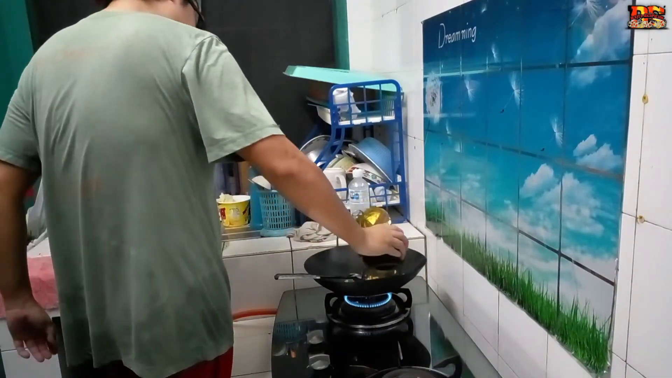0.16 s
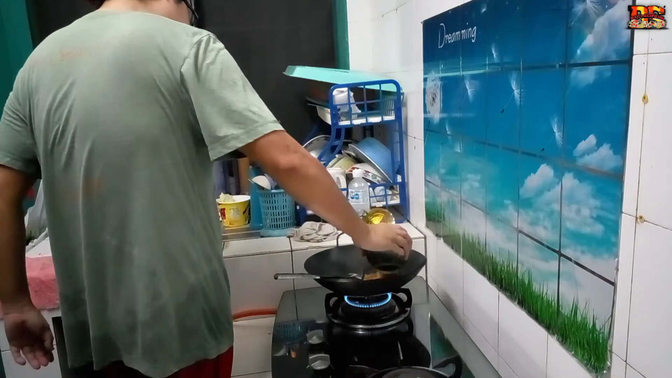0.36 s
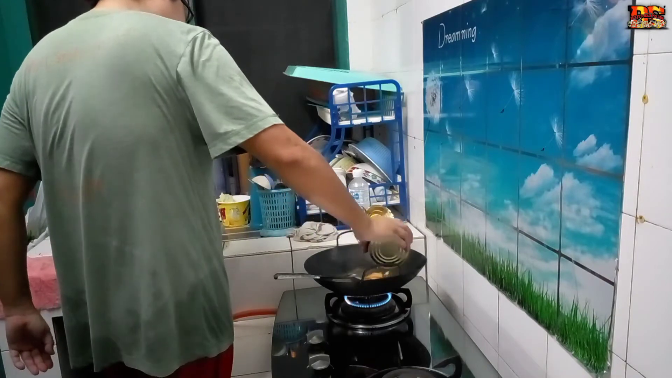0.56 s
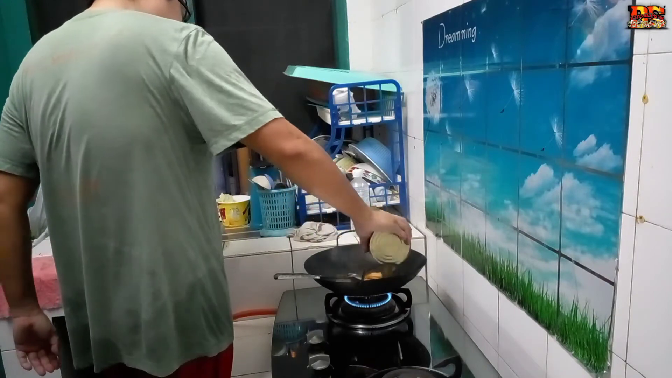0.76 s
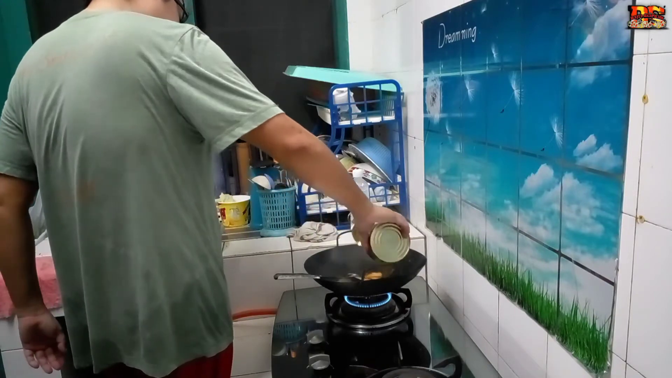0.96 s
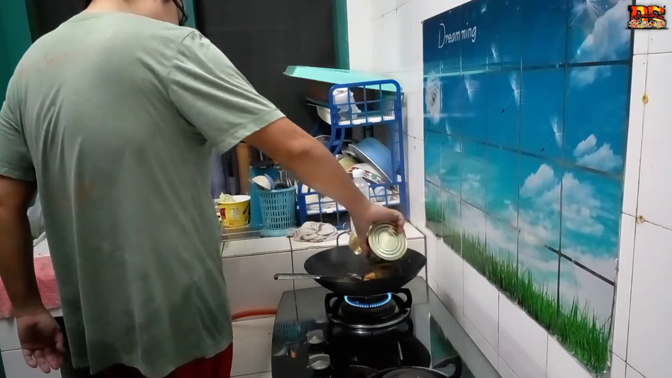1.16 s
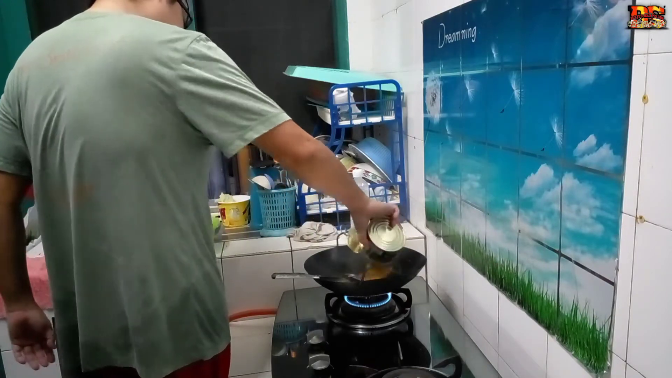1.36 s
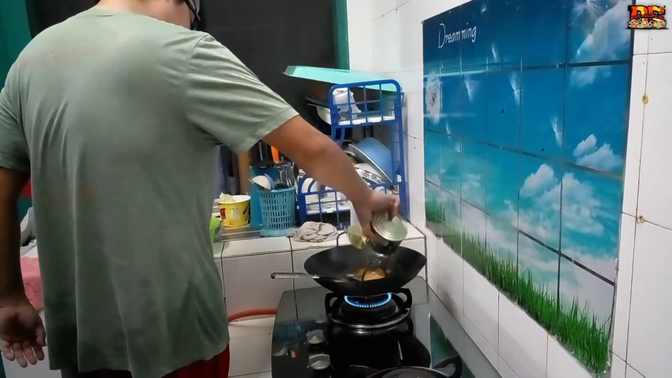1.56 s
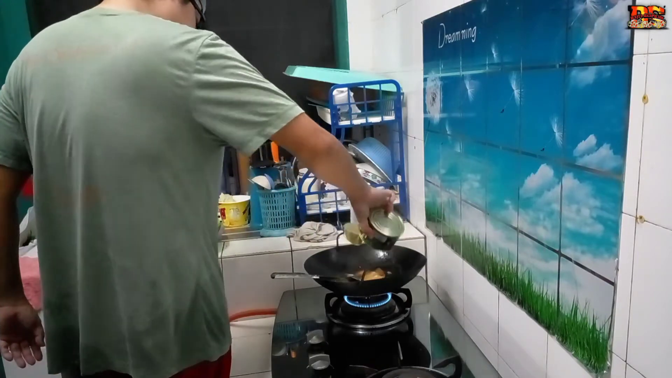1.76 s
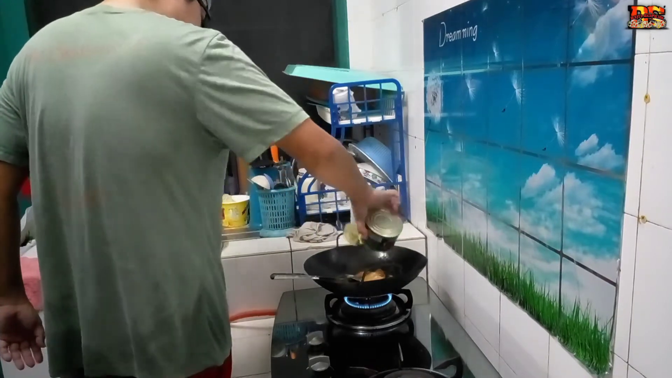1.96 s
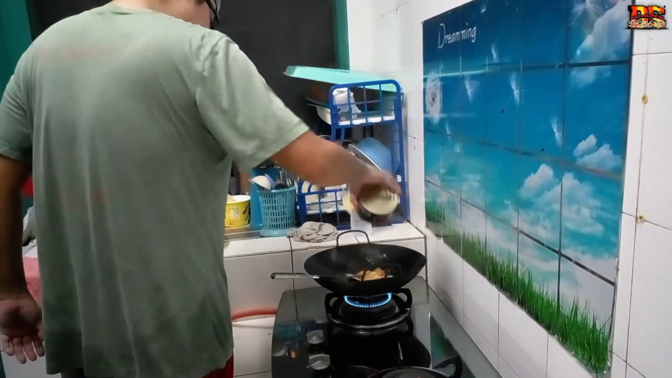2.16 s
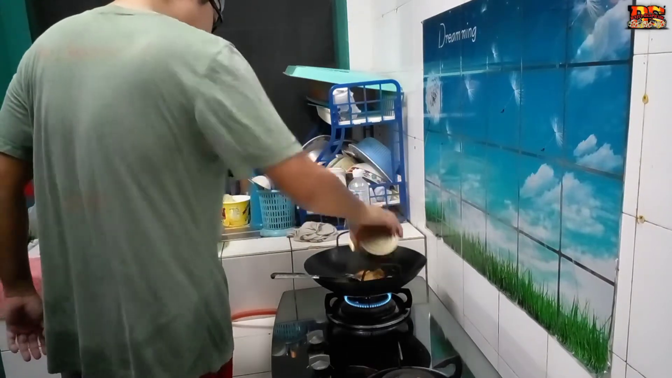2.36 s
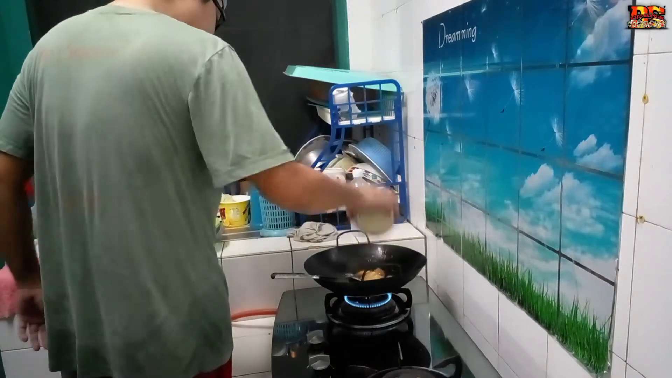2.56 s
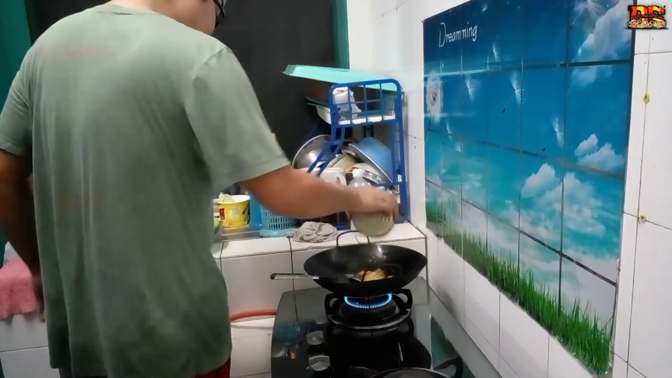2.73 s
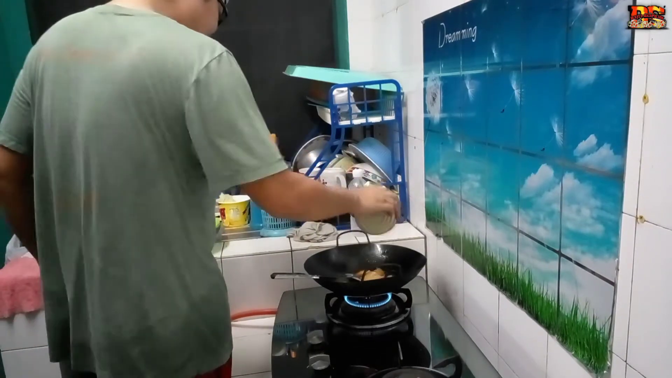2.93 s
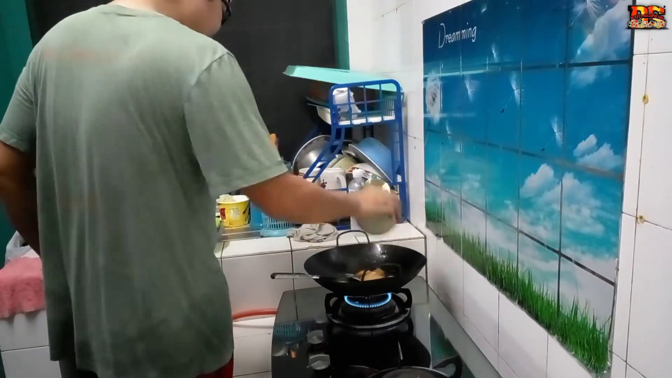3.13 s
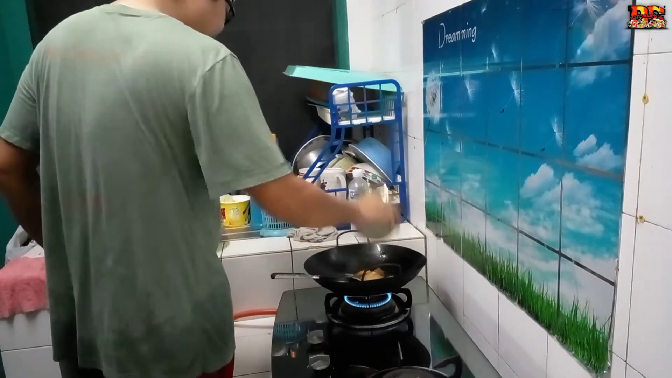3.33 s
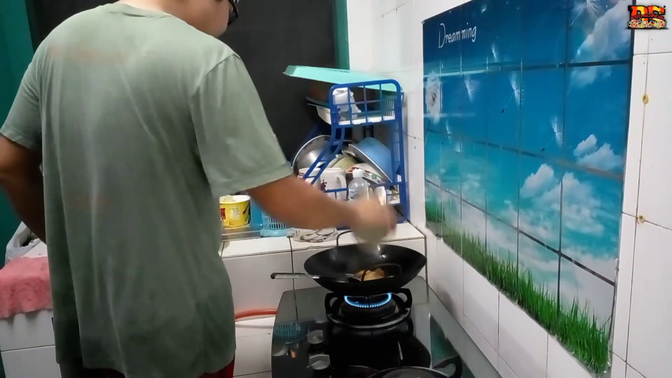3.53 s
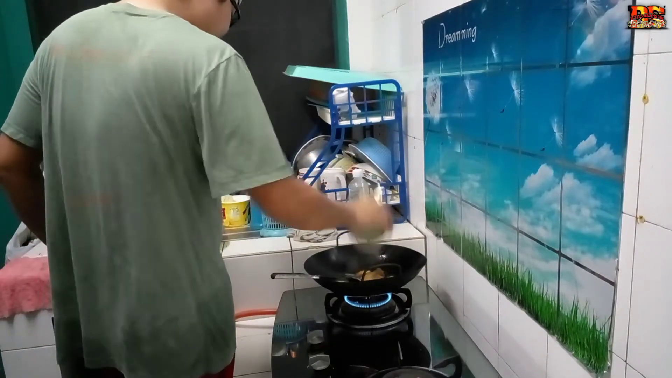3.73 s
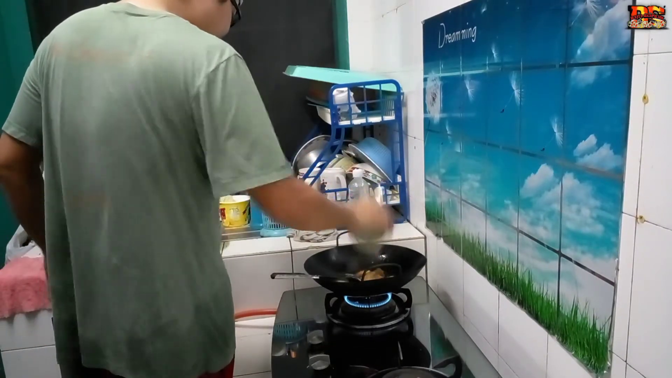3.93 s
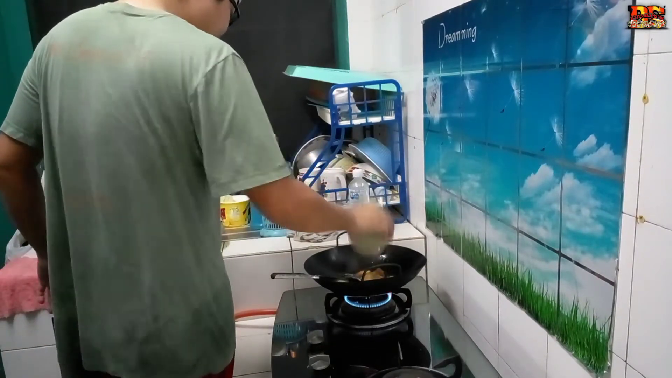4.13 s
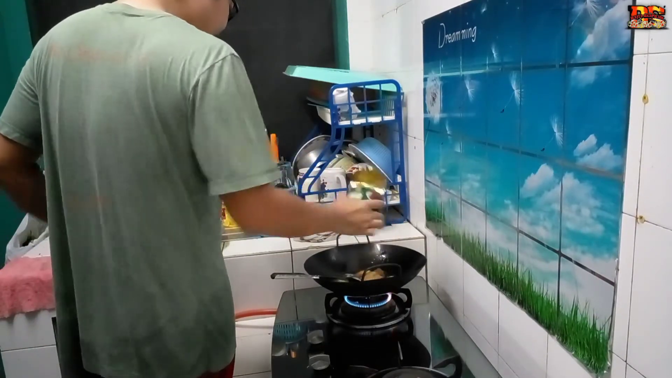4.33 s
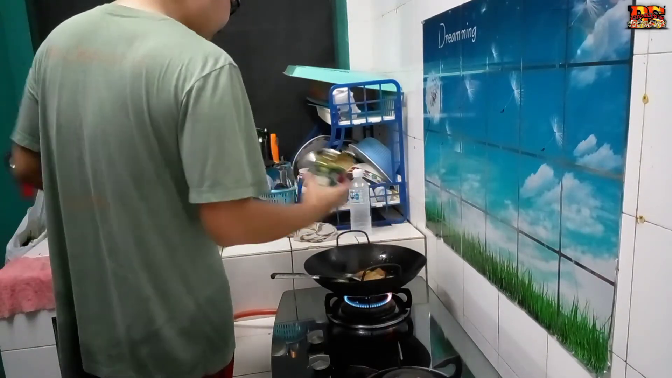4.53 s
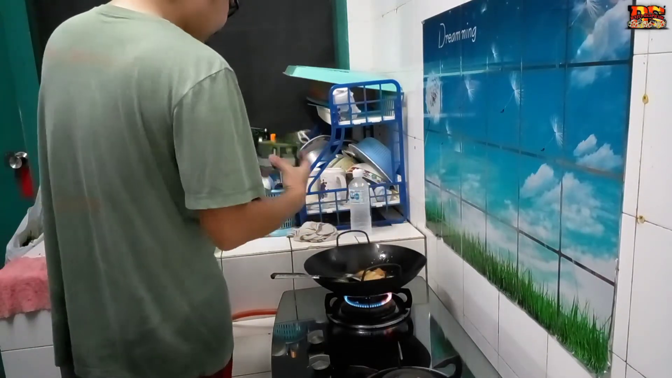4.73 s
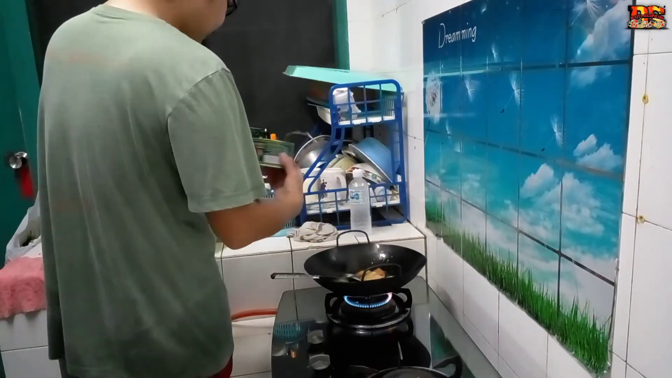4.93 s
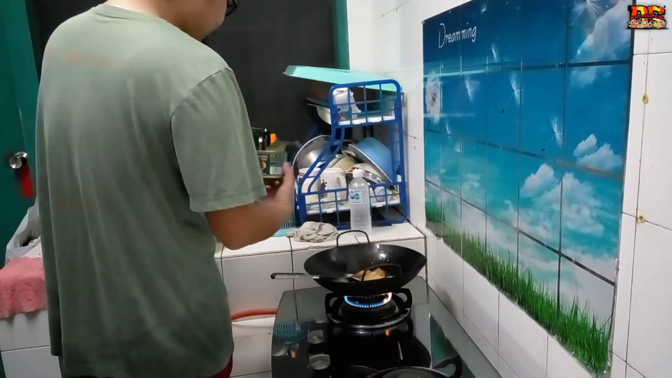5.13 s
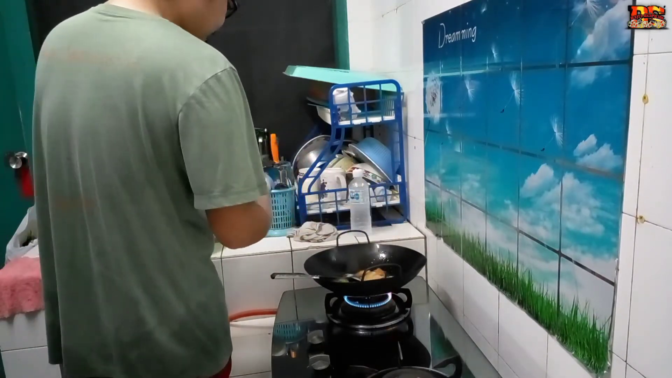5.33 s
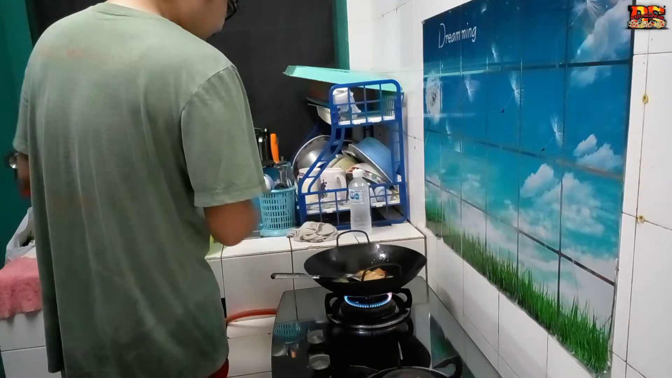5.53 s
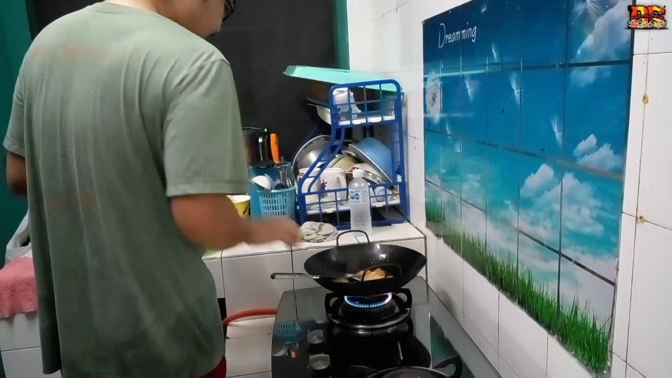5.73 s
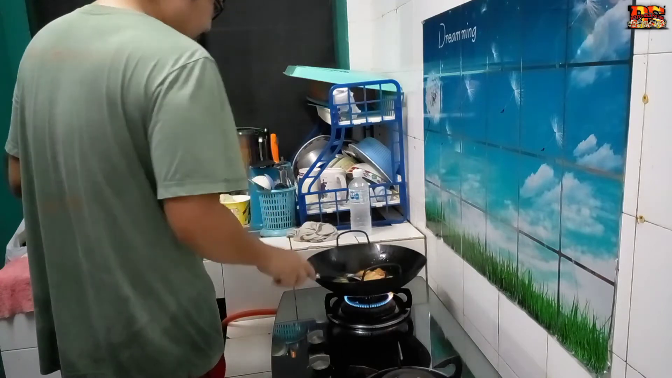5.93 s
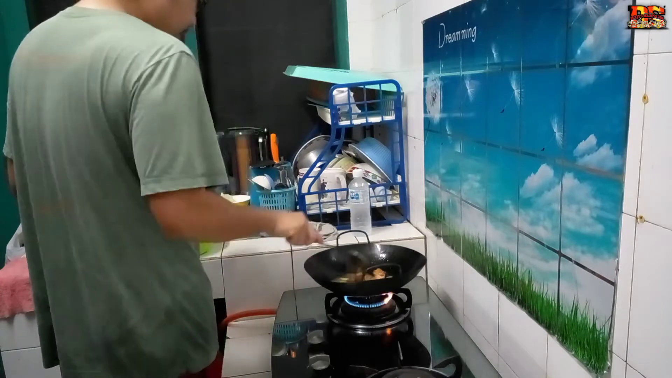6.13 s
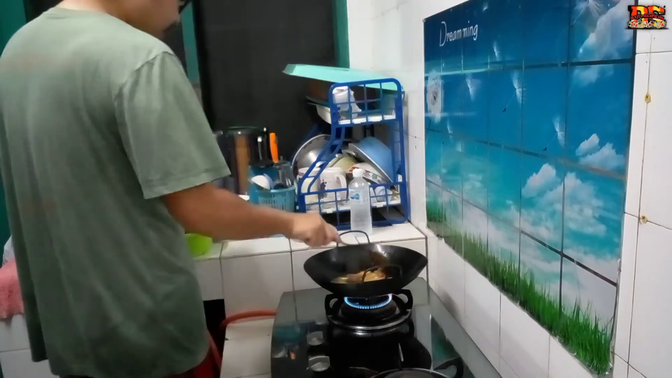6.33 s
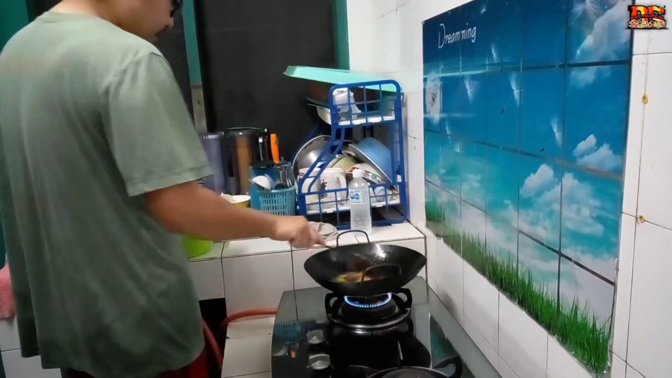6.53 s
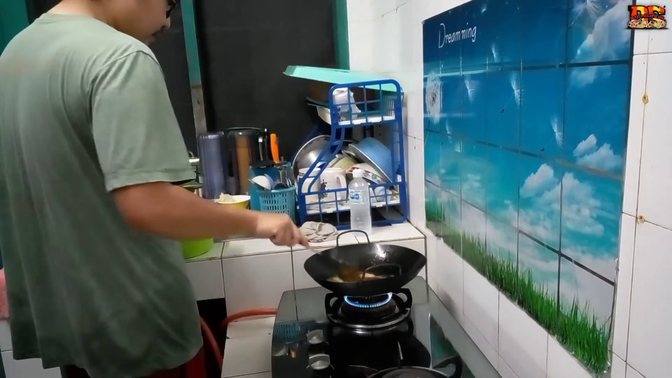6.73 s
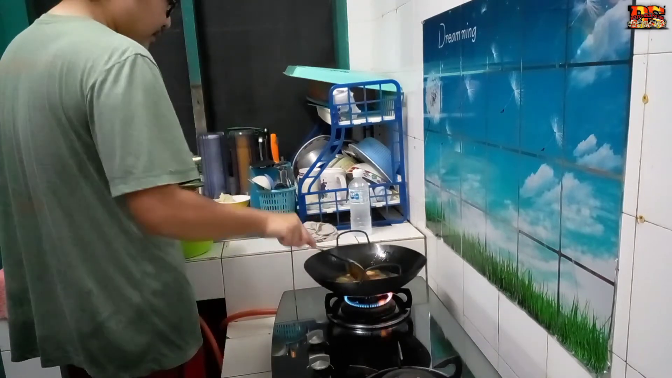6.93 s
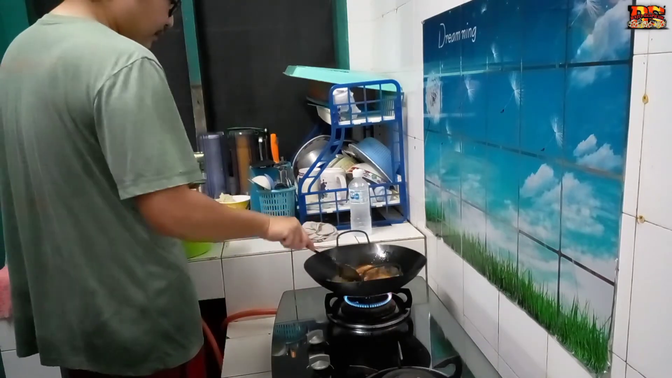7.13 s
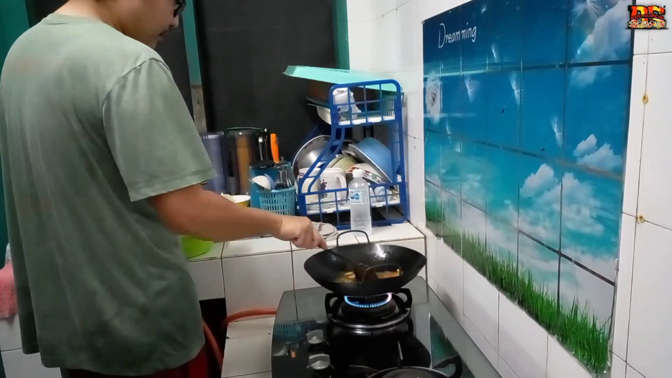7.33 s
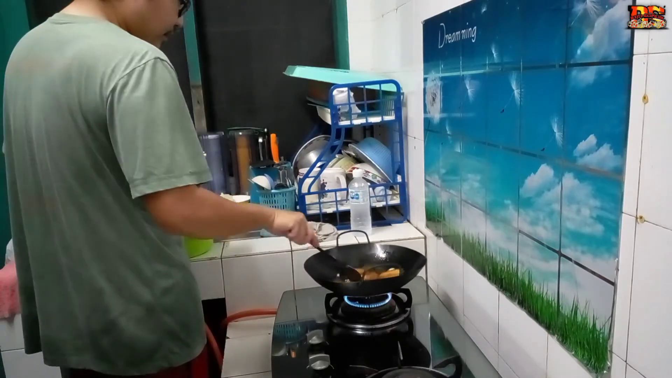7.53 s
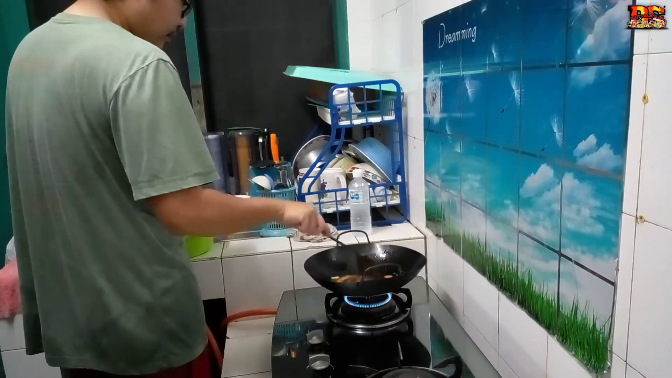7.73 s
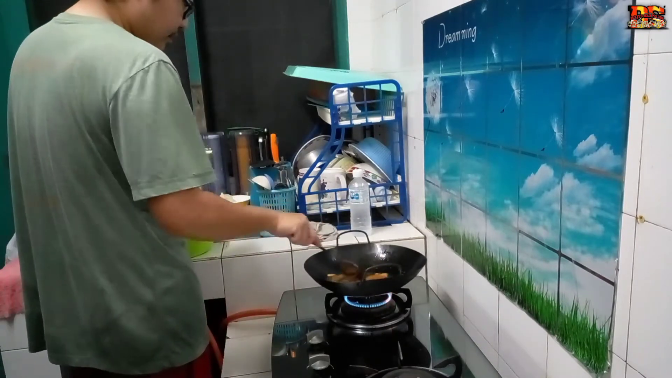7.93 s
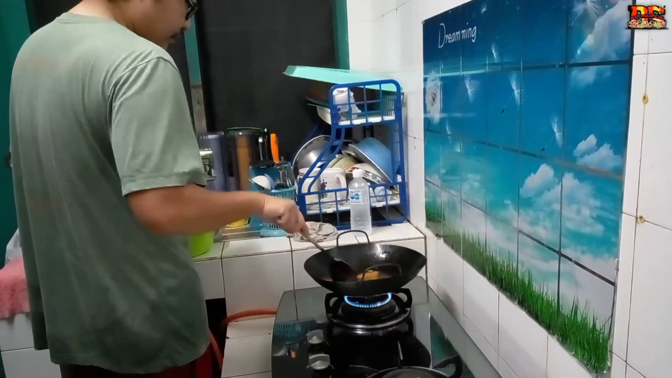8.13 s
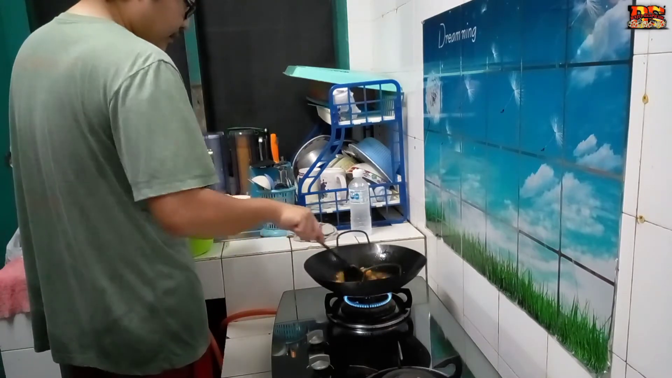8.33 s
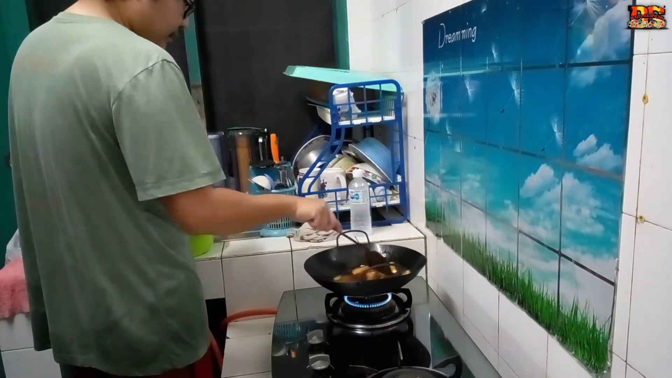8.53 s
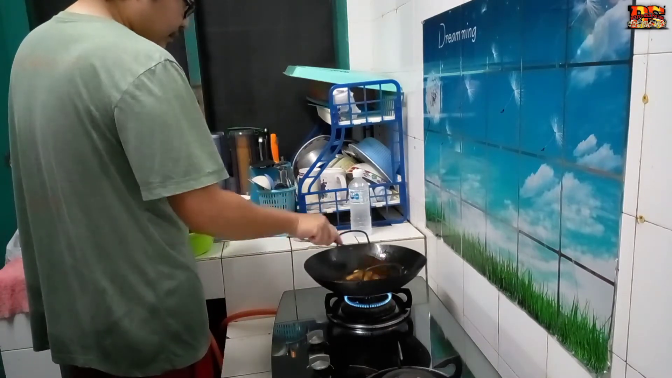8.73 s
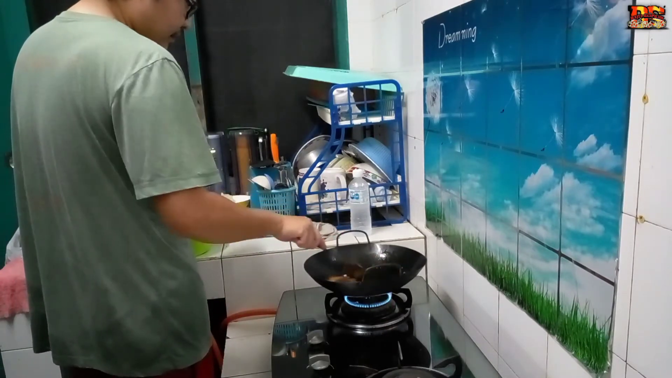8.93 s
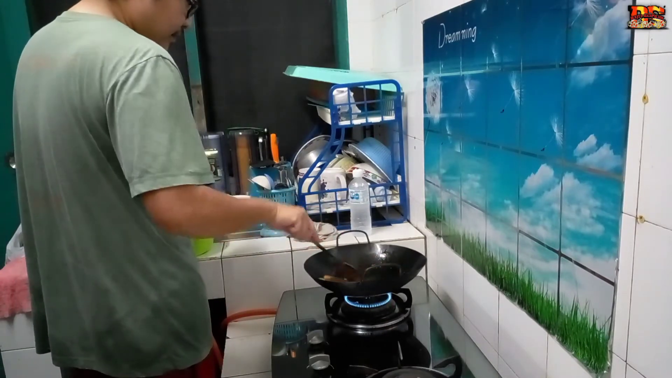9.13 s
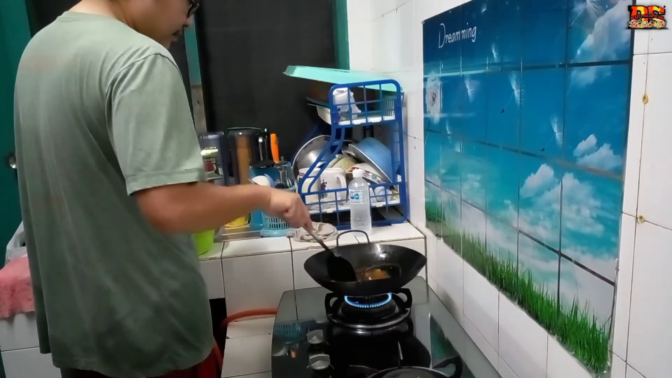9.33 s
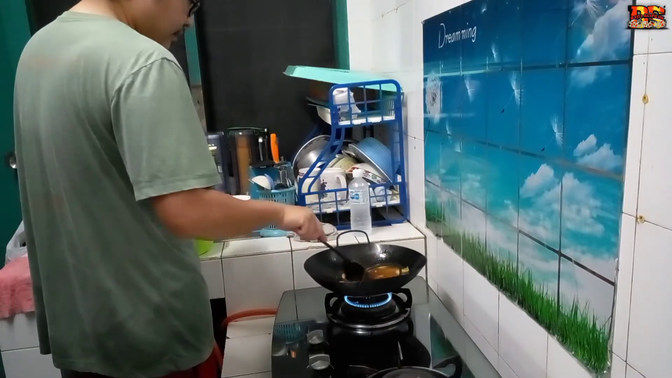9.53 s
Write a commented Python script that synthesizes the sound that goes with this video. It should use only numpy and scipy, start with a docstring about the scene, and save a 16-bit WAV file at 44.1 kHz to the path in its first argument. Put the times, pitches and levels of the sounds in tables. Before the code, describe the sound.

A loud, steamy burst of frying in a steel wok dies down to crackles, followed by light spatula scrapes over a faint gas flame.

```python
"""Wet food fries in hot oil in a steel wok, heard through one microphone in a tiled kitchen.
First steam bubbles burst by the thousand as random clicks, with a rush of steam, and ring the wok's modes.
As the frying sinks, drops of gravy spit in short decaying bursts of pops and hiss; then a spatula scrapes
in strokes of dense filtered catches and stirs the frying up again, before it settles.
Throughout, the gas flame rumbles as filtered noise and an appliance whines faintly as a few sines."""
import sys
import numpy as np
from scipy import signal
from scipy.fft import rfft, irfft
from scipy.io import wavfile

SR = 44100
rng = np.random.default_rng(int(sys.argv[2]) if len(sys.argv) > 2 else 0)


def output_pcm(signal):
    """Save a mono or channel-first signal as 16-bit PCM at the path in sys.argv[1].

    Samples are clipped to [-1, 1] before scaling.
    """
    pcm = np.clip(np.atleast_2d(signal).T, -1, 1) * 32767
    wavfile.write(sys.argv[1], SR, np.round(pcm).astype(np.int16))


N = 422037


# Frying left alone, stirred, then settling. Each row: time in seconds, bubbling level in dB,
# fine hiss level in dB.
FRYING_LEVELS = [(0.0, -24.5, -17), (0.45, -23.5, -17), (1.14, -29.5, -23.5), (1.7, -31.5, -27),
                 (2.0, -30, -26), (2.76, -35.5, -31), (3.41, -39.5, -36), (4.21, -43, -40),
                 (5.23, -44, -42), (5.48, -48, -46), (6.08, -47, -45.5), (6.33, -35.5, -37.5),
                 (6.55, -42.5, -36), (6.63, -42.5, -39.5), (6.9, -36.5, -33), (7.05, -45, -38.5),
                 (7.25, -37, -36), (7.48, -42.5, -37.5), (7.69, -39.5, -35.5), (7.93, -40.5, -38.5),
                 (8.15, -45, -41.5), (8.4, -45.5, -40.5), (8.79, -38, -36), (9.06, -45, -42.5),
                 (9.25, -47, -45.5), (9.57, -47, -43.5)]
# How hard the gravy boils, as its rush of steam. Each row: time in seconds, level in dB.
BOILING_RUSH = [(0.0, -20), (0.52, -18.5), (0.62, -25.5), (1.1, -30), (1.38, -35.5), (1.45, -24.5),
                (1.6, -27.5), (1.8, -36), (2.05, -33), (2.3, -43), (2.6, -33.5), (2.8, -41), (3.2, -40.5),
                (3.6, -60)]
# Spectra of big bursts, small bursts and rushing steam. Each row: frequency in Hz,
# relative density in dB per Hz.
BUBBLING_SPECTRUM = [(260, -40.5), (450, -22.5), (565, -18), (891, -3.5), (930, -4.5), (1010, -4),
                     (1230, 2.5), (1330, 1.5), (1880, -1), (2440, -10), (3760, -21.5), (4530, -19.5),
                     (6000, -29.5), (7800, -36), (13200, -120)]
HISS_SPECTRUM = [(1200, -48.5), (1650, -17), (2800, 0), (3300, -1), (5620, -1), (6440, -4.5), (7180, -2.5),
                 (8000, 4), (10300, -2), (12500, 4), (14300, 3), (15400, 1.5), (16800, -5)]
RUSH_SPECTRUM = [(400, -59), (900, -63), (1400, 0.5), (1840, 2.5), (2400, -7), (3400, -14), (4200, -3),
                 (5000, -6), (6500, -24.5), (10000, -64)]
# Upper modes of the wok. Each entry: frequency in Hz.
WOK_MODES_HZ = [535, 603, 770, 845, 937, 1066, 1136, 1227, 1254, 1295, 1400, 1534, 1770, 1836, 1927, 2000,
                2051, 2270]
# Ringing of the same modes over the direct bursts. Each entry: lift in dB.
WOK_MODES_LIFT_DB = [-11, -22, -4, 4.5, -1.5, 1, -12, -0.5, 3, -6.5, -39, 2, -7.5, -44, -27, -13, -4, 3]
WOK_WIDTH_HZ = 11
# fixed offsets: from a spit's nominal peak down to its pops' level; up for its hiss
POPS_BELOW_PEAK_DB, SPIT_HISS_RAISE_DB = 8.5, 6.5


def frying():
    """Impulsive excitation: big bursts ring the oil and wok, small ones hiss, hard boiling rushes."""
    bubbling_db, hiss_db = in_time(FRYING_LEVELS)
    drops = sputter(26, t60=0.074, lift_db=-7.5)
    _, spit_peak_db, spit_hiss_db, _ = np.transpose(SPITTING_DROPS)
    spit_db = spit_peak_db - POPS_BELOW_PEAK_DB
    spit_pops = spit_envelope(spit_db)
    spit_hiss = spit_envelope(spit_db + spit_hiss_db + SPIT_HISS_RAISE_DB)

    bursts = grains(9000, spread_db=1.5, clump_db=0.8)
    fizz = rms_one(bursts + 0.39 * grains(15000, spread_db=3.5, clump_db=2.5))
    hard_pops = grains(450, spread_db=3.0, clump_db=-0.6)   # a drop bursts in a few hard pops
    pops = rms_one(hard_pops + 0.47 * fizz)

    big = bursts * drops * amp(bubbling_db) + pops * spit_pops
    small = fizz * drops * amp(hiss_db) + rms_one(pops + 3.0 * fizz) * spit_hiss
    rush_db, = in_time(BOILING_RUSH)
    rush = grains(12000, spread_db=1.5, clump_db=-2.3) * amp(rush_db)

    ringing = sum(amp(db) * resonance(big, hz, WOK_WIDTH_HZ)
                  for hz, db in zip(WOK_MODES_HZ, WOK_MODES_LIFT_DB))
    return (colour(big + ringing, BUBBLING_SPECTRUM) + colour(small, HISS_SPECTRUM)
            + colour(rush, RUSH_SPECTRUM))


def sputter(per_s, t60, lift_db):
    """Shot process: many small drops each raise the power suddenly, then it decays quickly."""
    starts = (rng.random(N) < per_s / SR) * rng.exponential(1, N) * amp(lift_db) ** 2
    fade = amp(-60 / (t60 * SR)) ** 2
    power = 1 + signal.lfilter([1], [1, -fade], starts)
    return rms_one(np.sqrt(power))


# Drops of gravy spitting in the oil. Each row: start in seconds, nominal peak in dB,
# nominal hiss against bubbling in dB, t60 in seconds.
SPITTING_DROPS = [(0.814, -11, -8.5, 0.068), (1.29, -14.5, -12, 0.06), (1.438, -12.5, -12, 0.089),
                  (2.13, -17, -14, 0.065), (2.261, -21.5, -25, 0.38), (2.529, -27, -6, 0.11),
                  (2.68, -22, -12, 0.097), (2.825, -14, -22, 0.2), (2.977, -19, -15, 0.13),
                  (3.021, -22, -7, 0.17), (3.187, -28.5, -4, 0.24), (3.296, -30.5, -11, 0.4),
                  (3.475, -25, -10, 0.067), (3.58, -23, -12, 0.2), (3.667, -26, -10, 0.13),
                  (3.829, -26, -9, 0.22), (3.92, -26, -16, 0.098), (4.021, -20.5, -15, 0.21),
                  (4.197, -34, -12, 0.38), (4.427, -27, -6, 0.3), (4.444, -22, -14, 0.24),
                  (4.639, -32, -14, 0.26), (4.704, -30, -16, 0.088), (4.79, -36, -21, 0.08),
                  (4.859, -18, -11, 0.19), (4.973, -26, -13, 0.15), (5.027, -25.5, -19, 0.086),
                  (5.203, -28, -15, 0.21), (5.29, -28, -17, 0.12), (5.356, -36, -4, 0.3),
                  (5.392, -29, -5.5, 0.17), (6.095, -31, -20, 0.074)]
SPIT_RISE_SHARE = 0.054   # scales the rise time with the t60


def spit_envelope(db):
    """Flash evaporation: each drop bursts to steam within some ms and boils away exponentially."""
    power, since = np.zeros(N), np.arange(SR // 2) / SR
    for (s, _, _, t60), top_db in zip(SPITTING_DROPS, db):
        fade = amp(top_db - 60 * since / max(t60, .02))
        rise = np.minimum(0.58 + since / (SPIT_RISE_SHARE * t60), 1)
        power[round(s * SR):][:len(since)] += (fade * rise) ** 2
    return np.sqrt(power)


# Spectra of the rasping edge and of the blade's body. Each row: frequency in Hz,
# relative density in dB per Hz.
RASP_SPECTRUM = [(1500, -64), (2800, -9), (3600, -7), (4050, 0.5), (4500, 4), (5100, -1), (5600, -6.5),
                 (7000, -19), (10000, -64)]
BLADE_SPECTRUM = [(500, -60), (1000, -17), (1500, -4), (1900, -1), (2200, -4.5), (2800, -7.5), (3400, -11),
                  (4200, -37), (7000, -63)]
BLADE_SWELL_DB = 5   # the blade swells this much more than the edge


def spatula():
    """Friction as dense tiny catches on the steel: the edge rasps high, the blade answers lower."""
    _, _, rasp_db, blade_db, _, _ = np.transpose(SPATULA_STROKES)
    catches = grains(7000, spread_db=1.5, clump_db=1.6)
    rasp = catches * stroke_envelope(rasp_db, 0)
    blade = catches * stroke_envelope(blade_db, BLADE_SWELL_DB)
    return colour(rasp, RASP_SPECTRUM) + colour(blade, BLADE_SPECTRUM)


# Strokes of the spatula on the steel. Each row: start in seconds, length in seconds, edge rasp in dB,
# blade body in dB, swell from bite to peak in dB, peak position as a share of the length.
SPATULA_STROKES = [(6.162, .14, -46, -46, 3, 0.44), (6.638, 0.31, -35, -31, 9, 0.37),
                   (7.072, .29, -38.5, -33, 2, .57), (7.437, 0.38, -40.5, -42.5, 2, .3),
                   (7.953, .18, -39.5, -45, 7, 0.65), (8.142, 0.23, -47.5, -46, 2, 0.37),
                   (8.409, 0.038, -36, -49, 1, .2), (8.462, 0.084, -37.5, -39.5, 1, .3),
                   (8.558, 0.21, -42.5, -42, 5, 0.7), (8.93, .18, -43.5, -54, 8, 0.45),
                   (9.118, 0.23, -42, -42, 9, 0.53)]
TOUCH_S, LIFT_T60_S = .006, 0.39   # the edge bites at once and trails off after the stroke
END_SAG_DB = 5   # pressure lost between peak and lift, before any extra swell


def stroke_envelope(db, extra_db):
    """Contact pressure sets loudness: each stroke bites, swells to its peak, sags and trails off."""
    power, t = 0, np.arange(N) / SR
    for (s, length, _, _, swell_db, peak), top_db in zip(SPATULA_STROKES, db):
        peak_s = np.clip(peak, .05, .95) * length
        press_db = np.interp(t - s, [0, peak_s, length],
                             [-swell_db - extra_db, 0, -END_SAG_DB - extra_db])
        trail_db = 60 * np.maximum(t - s - length, 0) / LIFT_T60_S
        touch = np.clip((t - s) / TOUCH_S, 0, 1)
        power = power + (touch * amp(top_db + press_db - trail_db)) ** 2
    return np.sqrt(power)


# Lowest modes of the bowl and of the pan support. Each row: frequency in Hz, width in Hz,
# relative level in dB.
BOWL_MODES = [(239, 29, -1), (332, 32, -7), (415.7, 23, 0), (493, 99, -4.5)]
STAND_MODES = [(133, 10, -2), (151, 21, -2)]
# How hard the boiling shakes them. Each row: time in seconds, bowl level in dB, stand level in dB.
BOILING_SHAKE = [(0, -42.5, -61), (.38, -39.5, -46), (.6, -44.5, -56), (1.0, -43, -54), (1.85, -54, -67),
                 (2.0, -46, -50), (2.17, -53.5, -56), (2.3, -46.5, -63), (2.68, -47.5, -59),
                 (2.8, -62, -62), (4.0, -68.5, -66), (5.5, -80, -81)]
# A heavy stroke shakes the bowl. Each row: time in seconds, level in dB.
HEAVY_DRAG = [(9.05, -64), (9.165, -42), (9.23, -56), (9.27, -44.5), (9.4, -71)]
BOWL_LUMPS_DB, STAND_LUMPS_DB, LUMPS_PER_S = 3.5, 3.5, 5.2   # the shaking comes in lumps
KNOCK_DB = -25.5   # each spit jolts the bowl, this far from its pops' level


def wok_drone():
    """Forced modal vibration: uneven shaking keeps the lowest modes of bowl and support murmuring."""
    band = signal.butter(2, [90, 600], "band", fs=SR, output="sos")
    shake = signal.sosfilt(band, grains(3000, spread_db=4.5, clump_db=2.5))
    bowl, stand = ring_modes(shake, BOWL_MODES), ring_modes(shake, STAND_MODES)
    bowl_db, stand_db = in_time(BOILING_SHAKE)
    drag_db, = in_time(HEAVY_DRAG)
    jolts = spit_envelope(np.array(SPITTING_DROPS)[:, 1] - POPS_BELOW_PEAK_DB + KNOCK_DB)
    bowl_gain = amp(bowl_db + BOWL_LUMPS_DB * drift(LUMPS_PER_S)) + amp(drag_db) + jolts
    stand_gain = amp(stand_db + STAND_LUMPS_DB * drift(LUMPS_PER_S))
    return bowl * bowl_gain + stand * stand_gain


def ring_modes(x, modes):
    """Modal superposition: resonances driven by one force, summed to rms 1."""
    return rms_one(sum(amp(db) * rms_one(resonance(x, hz, width_hz)) for hz, width_hz, db in modes))


# Spectrum of the burner. Each row: frequency in Hz, relative density in dB per Hz.
FLAME_SPECTRUM = [(12, -45), (20, -22), (50, -6), (92, -4), (201, -2.5), (274, -6.5), (370, -12),
                  (458, -15), (478, -31), (600, -71), (780, -24), (1320, -120)]
FLAME_DB = -60.5


def flame():
    """Combustion noise: broadband noise shaped to a low roar of nearly steady level."""
    roar = colour(rng.standard_normal(N), FLAME_SPECTRUM, size=16384)
    return amp(FLAME_DB + 0.5 * drift(8.8)) * roar


# Partials of the whine. Each row: multiple of twice the mains frequency, level in dB.
BUZZ_PARTIALS = [(1, -71.5), (10, -60), (11, -54.5), (12, -73)]
MAINS_BUZZ_HZ = 100.15   # twice the mains frequency


def appliance_buzz():
    """Harmonic series: a faint steady whine on multiples of twice the mains frequency."""
    turn = 2 * np.pi * MAINS_BUZZ_HZ * np.arange(N) / SR
    return sum(np.sqrt(2) * amp(db) * np.sin(round(k) * turn + rng.uniform(0, 2 * np.pi))
               for k, db in BUZZ_PARTIALS)


KITCHEN_T60_S, KITCHEN_DB = 0.34, -14   # decay of the tail; its level against the direct sound


def kitchen(x):
    """Reverberation: direct sound plus a dense decaying tail off the tiles, total power kept."""
    t = np.arange(SR // 2) / SR
    tail = rng.standard_normal(len(t)) * amp(-60 * t / KITCHEN_T60_S) * (t > .003)
    tail = signal.lfilter([1], [1, -.7], tail)   # soft things swallow the treble
    tail *= amp(KITCHEN_DB) / np.linalg.norm(tail)
    tail[0] = 1   # direct sound
    return signal.fftconvolve(x, tail / np.linalg.norm(tail))[:N]


def grains(per_s, spread_db, clump_db):
    """Poisson-like impulses: random clicks of uneven size that come in clumps; rms 1."""
    born = rng.random(N) < per_s / SR
    sizes = amp(spread_db * np.minimum(rng.exponential(1, N), 5)) * rng.choice([-1, 1], N)
    clumps = amp(clump_db * (drift(5.4) + 0.21 * drift(27)))
    return rms_one(born * sizes * clumps)


def resonance(x, hz, width_hz):
    """Damped oscillator: a two-pole filter whose pole radius sets the bandwidth."""
    r = np.exp(-np.pi * width_hz / SR)
    poles = [1, -2 * r * np.cos(2 * np.pi * hz / SR), r * r]
    return signal.lfilter([(1 - r * r) / 2, 0, (r * r - 1) / 2], poles, x)


def colour(x, spectrum, size=4096):
    """Minimum phase: a causal filter of unit power gain, from the folded cepstrum of the spectrum."""
    hz, db = np.transpose(spectrum)
    grid = np.maximum(np.arange(size // 2 + 1) * SR / size, 1)
    cepstrum = irfft(np.log(amp(np.interp(np.log(grid), np.log(hz), db))))
    cepstrum[1:size // 2] *= 2
    cepstrum[size // 2 + 1:] = 0
    pulse = irfft(np.exp(rfft(cepstrum)))
    return signal.fftconvolve(x, pulse / np.linalg.norm(pulse))[:N]


def drift(rate):
    """Low-passed noise: slow chance of spread 1, computed at every 40th sample; rate in Hz."""
    r = np.exp(-80 * np.pi * rate / SR)
    noise = rng.standard_normal(N // 40 + 2002)
    slow = signal.lfilter([1], [1, -2 * r, r * r], noise)[2000:]   # skip the filter's run-in
    return np.interp(np.arange(N) / 40, np.arange(len(slow)), rms_one(slow))


def in_time(rows):
    """Linear interpolation of the dB columns at every sample; -120 dB outside the table."""
    s, *columns = np.transpose(rows)
    return [np.interp(np.arange(N) / SR, s, c, left=-120, right=-120) for c in columns]


def amp(db):
    """Decibel law: level in dB to amplitude ratio."""
    return 10 ** (np.asarray(db) / 20)


def rms_one(x):
    """Power normalisation: scale to rms 1."""
    return x / np.sqrt(np.mean(x ** 2) + 1e-20)


def scene():
    """Superposition: the sources add at one microphone, which feeds both channels."""
    heard = kitchen(frying() + spatula()) + wok_drone() + flame() + appliance_buzz()
    return np.array([heard, heard])


CUTOFF_HZ = 15820


def record(dry):
    """Band limiting: a steep elliptic low-pass cuts the top."""
    return signal.sosfilt(signal.ellip(14, .3, 80, CUTOFF_HZ, fs=SR, output="sos"), dry)


dry = scene()
out = record(dry)
output_pcm(out)
```